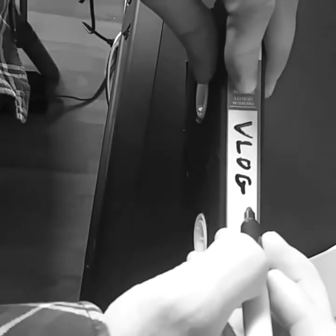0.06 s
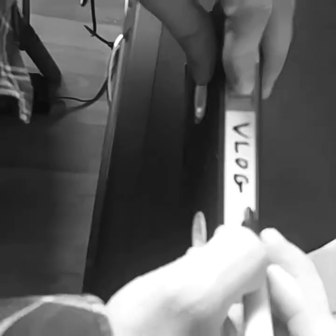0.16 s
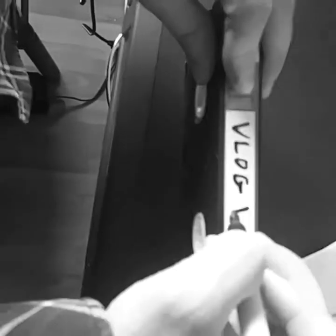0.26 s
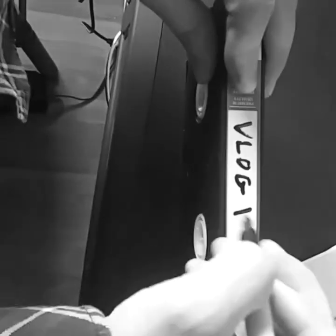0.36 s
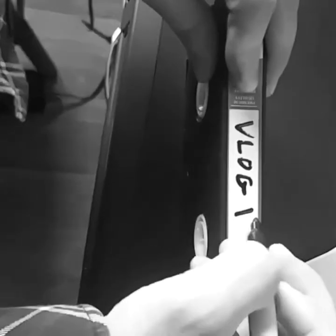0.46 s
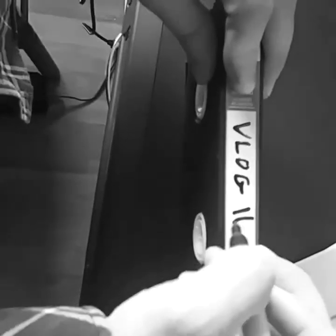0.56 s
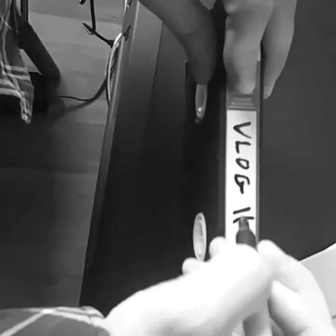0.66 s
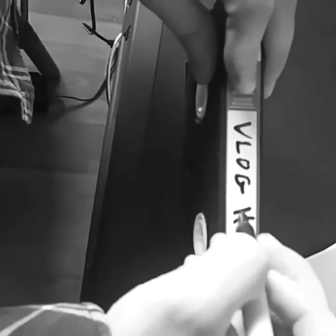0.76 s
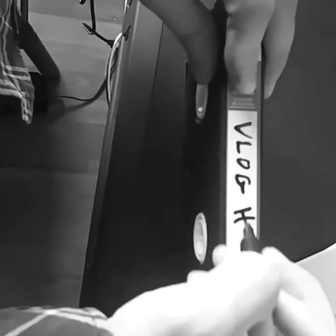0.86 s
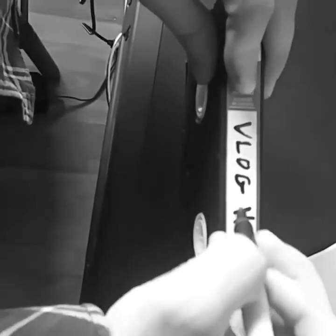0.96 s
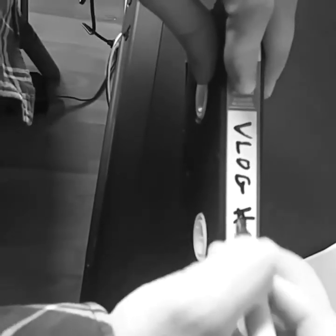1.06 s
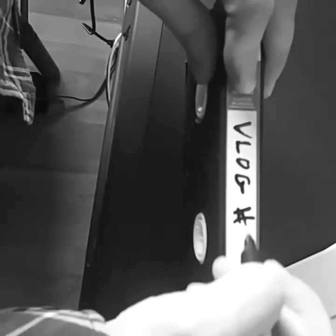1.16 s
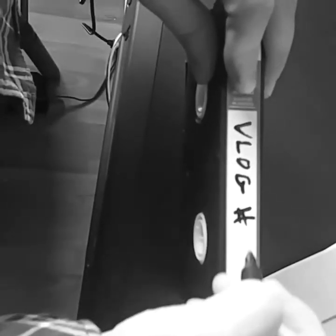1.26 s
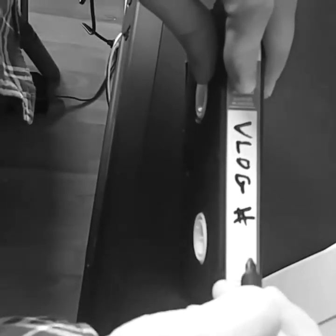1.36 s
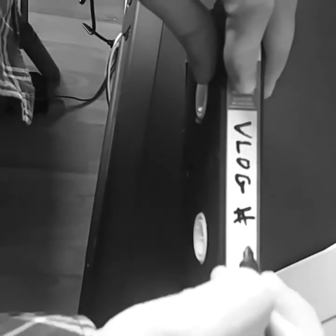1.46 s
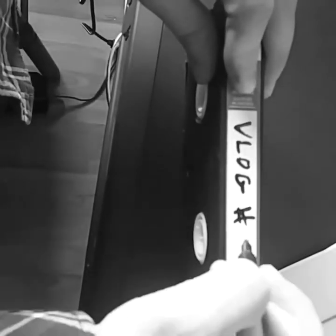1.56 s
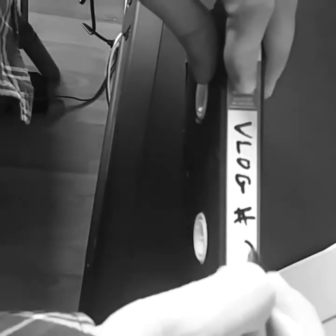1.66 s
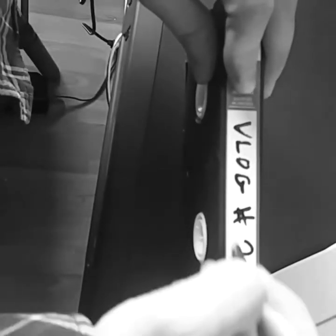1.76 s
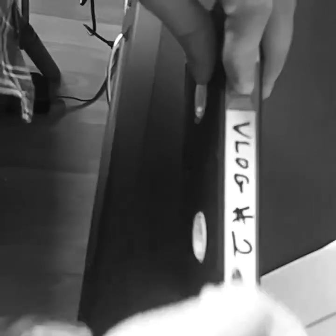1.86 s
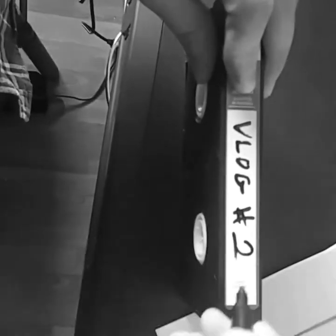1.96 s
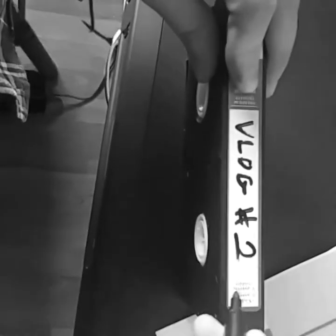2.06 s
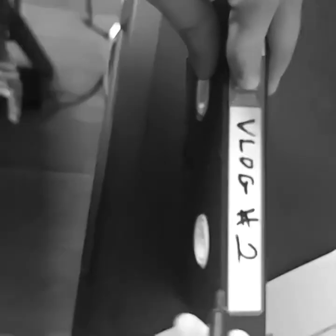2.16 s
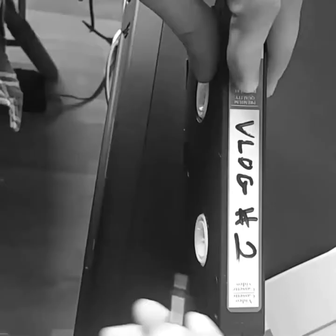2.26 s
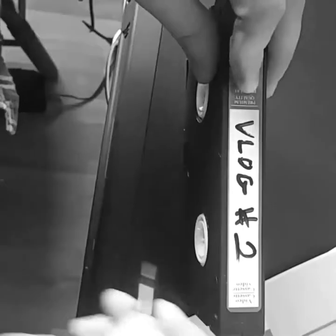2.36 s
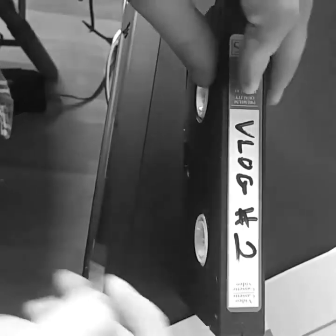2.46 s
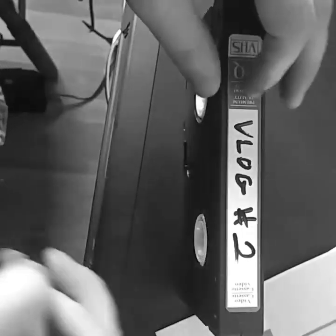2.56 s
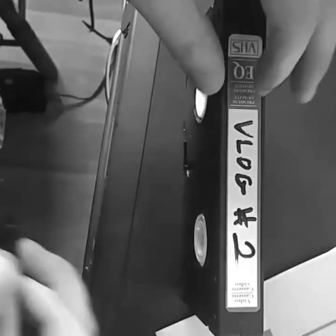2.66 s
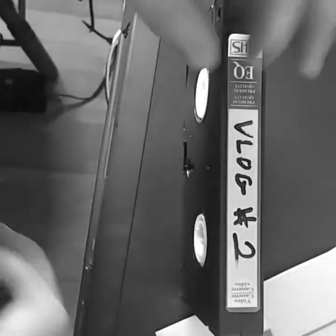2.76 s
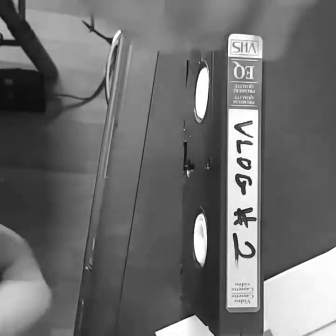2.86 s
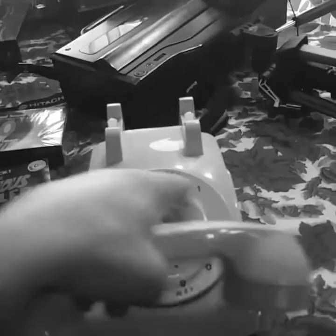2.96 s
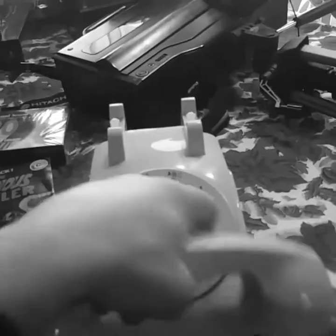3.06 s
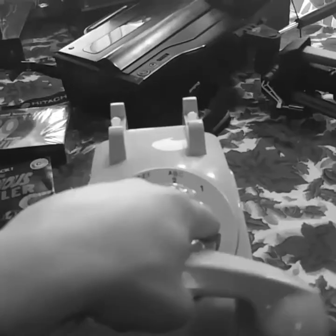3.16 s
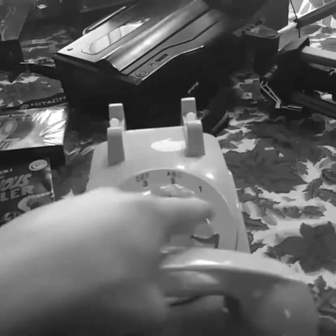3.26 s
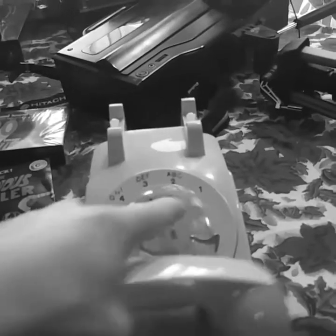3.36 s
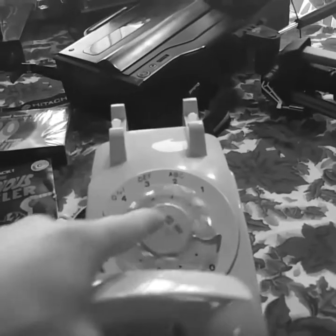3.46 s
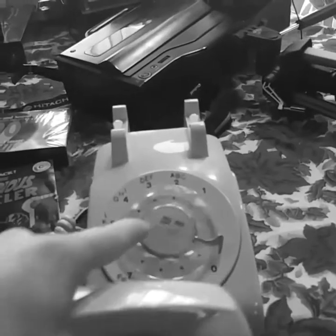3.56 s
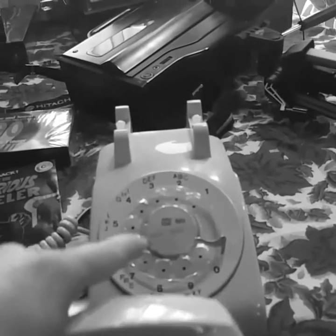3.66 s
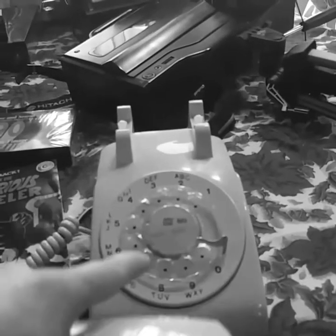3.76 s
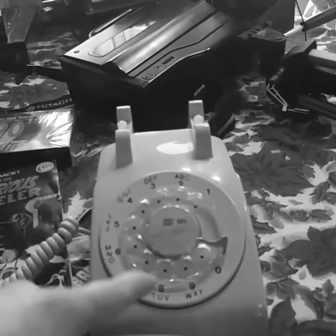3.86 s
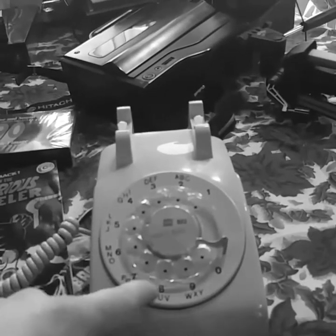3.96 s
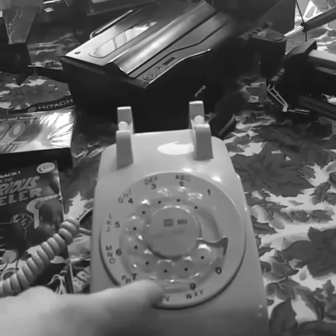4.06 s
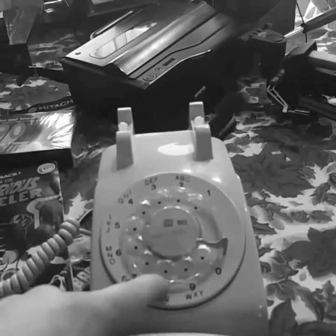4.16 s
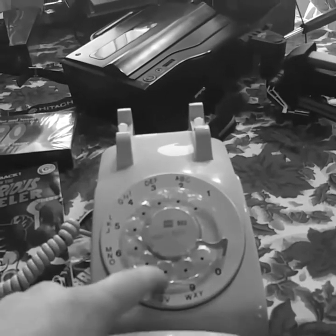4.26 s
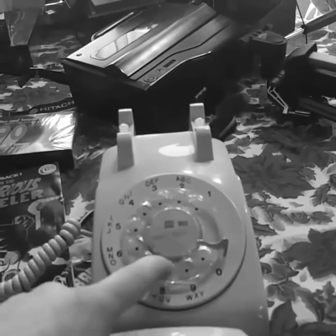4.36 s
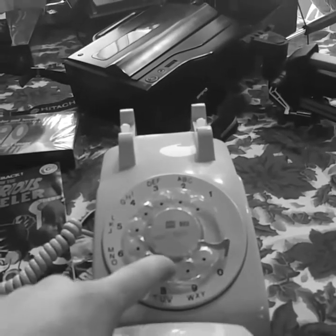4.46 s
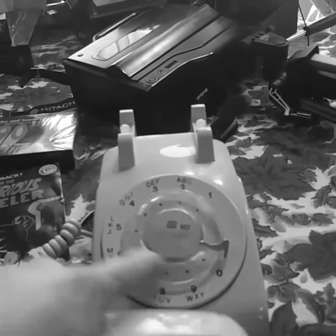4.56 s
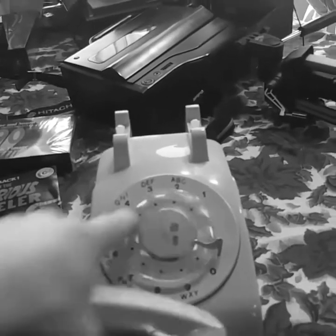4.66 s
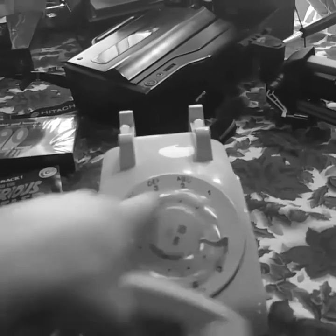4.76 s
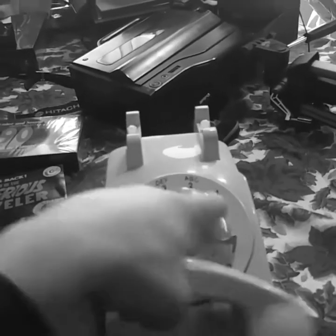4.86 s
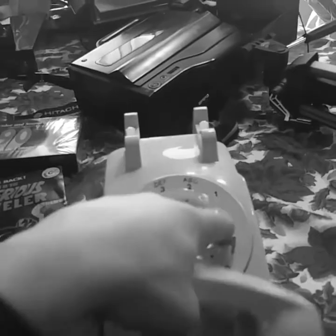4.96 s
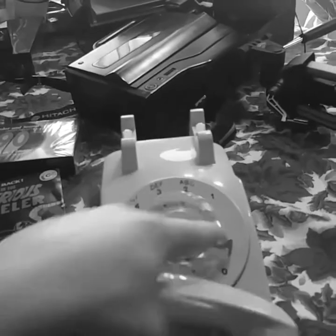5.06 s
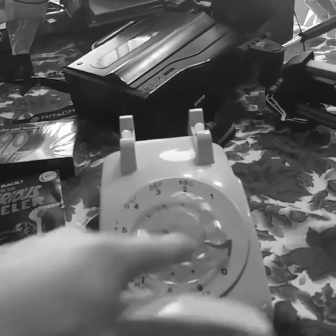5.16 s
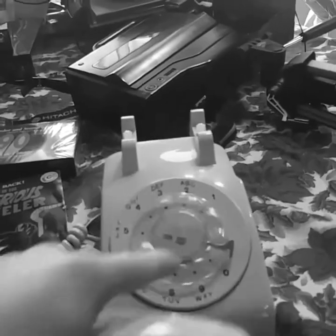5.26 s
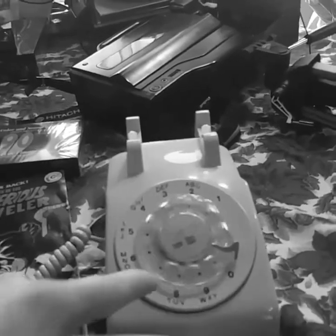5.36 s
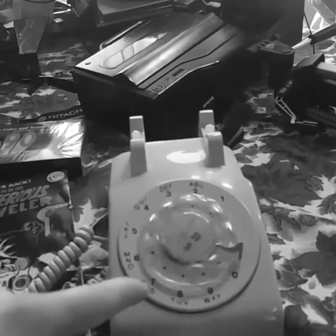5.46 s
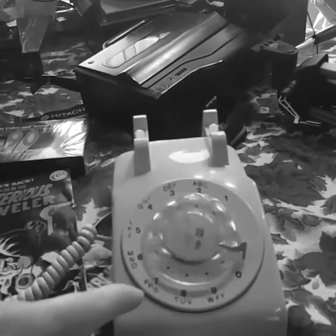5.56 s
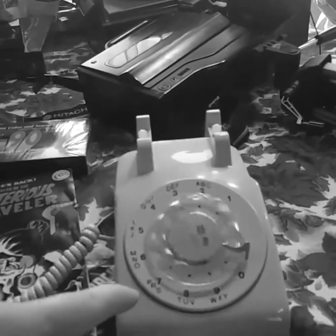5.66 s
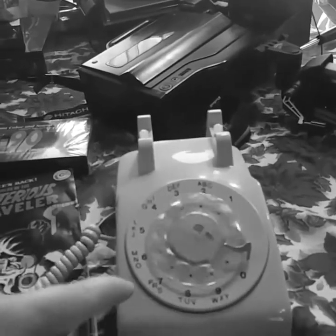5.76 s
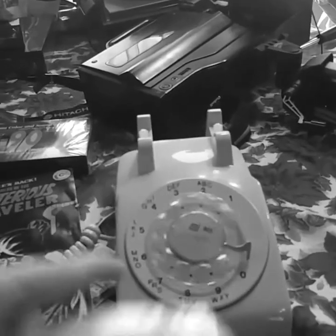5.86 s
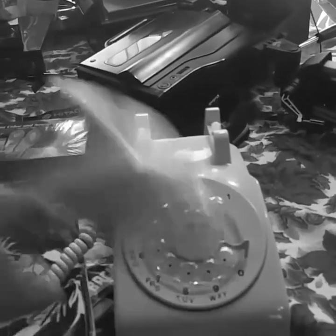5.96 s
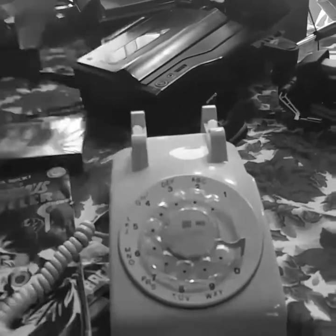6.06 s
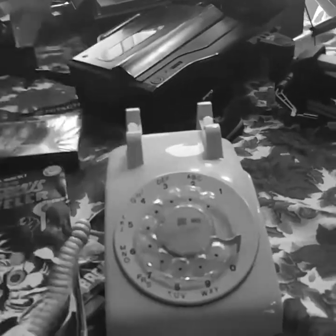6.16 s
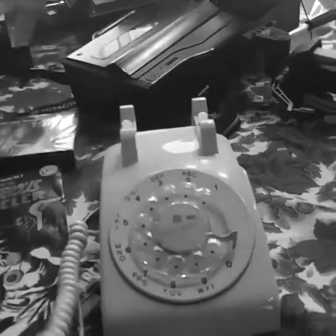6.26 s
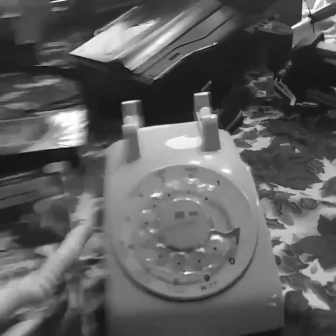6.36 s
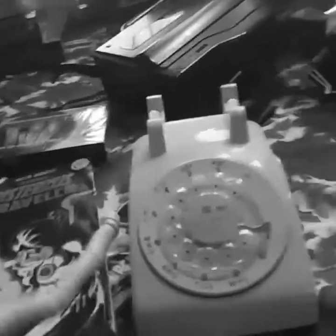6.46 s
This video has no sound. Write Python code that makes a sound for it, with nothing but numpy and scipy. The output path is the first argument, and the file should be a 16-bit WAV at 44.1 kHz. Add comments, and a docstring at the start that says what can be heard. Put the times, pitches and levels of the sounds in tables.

```python
"""A felt marker whispers on the label of a cassette box at a desk; then, at a table, a rotary telephone is dialled twice.
The finger winds the dial with a buzz of gear teeth; the spring runs it back with a whirr of gears and governor,
ending in a clack. The handset, held in the dialling hand, knocks on the table and on the plastic case.
Shaped noise makes the rubbing, tooth ticks the gears, short pushes and ringing modes the blows.
All is close: the direct sound outweighs the small furnished room, and a small microphone dulls the top."""
import sys
import numpy as np
from scipy import signal
from scipy.fft import rfft, irfft
from scipy.io import wavfile
from scipy.ndimage import uniform_filter1d

SR = 44100
rng = np.random.default_rng(int(sys.argv[2]) if len(sys.argv) > 2 else 0)


def bounce(signal):
    """Save signal as a 16-bit WAV file at the path given by the first command-line argument."""
    frames = np.transpose(np.atleast_2d(signal))
    limited = np.clip(frames, -1, 1)
    pcm = np.round(limited * 32767).astype(np.int16)
    wavfile.write(sys.argv[1], SR, pcm)


N = 287336
TIME = np.arange(N) / SR
TAIL = np.arange(SR // 2) / SR  # time axis of hits and room tail, s
HZ = np.fft.rfftfreq(8192, 1 / SR)  # frequency axis of all colours


def amp(db):
    """Decibels to gain."""
    return 10 ** (np.asarray(db) / 20)


def evened(x):
    """Scales to rms 1."""
    return x / np.sqrt(np.mean(x ** 2) + 1e-20)


def blow(x):
    """Scales a hit to the energy of 10 ms at rms 1."""
    return x / np.linalg.norm(x) * np.sqrt(SR / 100)


def read(points, hz=HZ):
    """Joins table rows on a log-frequency axis."""
    f, value = np.transpose(points)
    return np.interp(np.log(hz + 1), np.log(f + 1), value)


def add(mix, s, sound):
    """Mixes a sound in at time s."""
    part = mix[max(round(s * SR), 0):][:len(sound)]
    part += sound[:len(part)]


def gate(t, edge_s):
    """Fades in, holds, fades out."""
    return np.clip(np.minimum(t - t[0], t[-1] - t) / edge_s, 0, 1)


def colour(x, db):
    """Causal minimum-phase filter with the given gain at each of HZ."""
    log_gain = np.log(amp(np.maximum(db, db.max() - 90)))
    circle = np.concatenate([log_gain, log_gain[-2:0:-1]])
    spectrum = np.exp(np.conj(signal.hilbert(circle)))
    taps = np.fft.ifft(spectrum).real[:len(HZ)]
    return signal.oaconvolve(x, taps)[:len(x)]


def drift(n, per_s):
    """Smooth random wandering of rms 1."""
    width = max(int(SR / per_s), 1)
    smooth = uniform_filter1d(rng.standard_normal(n), width)
    return evened(uniform_filter1d(smooth, width))


def contact(hardness_hz):
    """A softer contact lasts longer and loses treble (dB)."""
    return -10 * np.log10(1 + (HZ / hardness_hz) ** 2)


def strike(db, chatter_t60, push):
    """One push and a dying chatter of loose parts and near echoes, through a body."""
    chatter = rng.standard_normal(len(TAIL)) * amp(-60 * TAIL / chatter_t60)
    chatter /= np.linalg.norm(chatter)
    chatter[0] += push
    return blow(colour(chatter, db))


def ringing(modes, reach_hz, rise_s):
    """A body's modes, each given a random starting phase; a slow push reaches only the low ones."""
    hz, db, t60 = np.transpose(modes)[:, :, None]
    level = db - 10 * np.log10(1 + (hz / reach_hz) ** 4)
    swing = np.sin(2 * np.pi * (hz * TAIL + rng.random(hz.shape)))
    sound = (amp(level - 60 * TAIL / t60) * swing).sum(0)
    return blow(sound * (1 - np.exp(-TAIL / rise_s)))


# plastic shell around the dial, relative levels: centre_hz, width_hz, level_db
HOUSING_RESONANCES = [(406, 430, -4.5), (923, 81, 1), (1176, 226, -2), (1916, 105, -3.5), (2294, 42, -14.5),
                      (3070, 190, -9.5), (3404, 150, -10), (3960, 670, -20), (5200, 280, -20.5)]


def housing(between_db=-27):
    """Resonances of the plastic shell around the dial (dB), over a floor between them."""
    power = amp(between_db) ** 2
    for hz, width, db in HOUSING_RESONANCES:
        power = power + amp(db) ** 2 / (1 + (2 * (HZ - hz) / width) ** 2)
    return 10 * np.log10(power)


# decay of the small furnished room: pitch_hz, t60_s
ROOM_DECAY = [(100, 0.47), (260, 0.65), (700, 0.21), (2000, 0.2), (6000, 0.24), (12000, 0.2)]


def room(x, wet_db, delay_s=0.0054):
    """Adds the tail of a small furnished room, each band dying at its own speed."""
    hz, t, z = signal.stft(rng.standard_normal(len(TAIL)), SR, nperseg=256)
    decay = amp(-60 * t / read(ROOM_DECAY, hz)[:, None])
    tail = signal.istft(z * decay, SR, nperseg=256)[1][:len(TAIL)]
    tail *= 1 - np.exp(-(TAIL / delay_s) ** 2)  # the reflections swell in after the direct sound
    return x + amp(wet_db) * signal.fftconvolve(x, tail / np.linalg.norm(tail))[:N]


# room rumble and hiss at the desk, ahead of the microphone's roll-off: pitch_hz, level_db per Hz
DESK_ROOM_TONE = [(25, -102), (50, -93.5), (75, -90), (120, -86), (165, -85.5), (230, -97.5), (300, -97.5),
                  (500, -111), (1500, -118), (4600, -120), (5450, -109), (6300, -118), (9000, -108),
                  (12500, -103)]
# the same at the telephone table: pitch_hz, level_db per Hz
TABLE_ROOM_TONE = [(25, -99), (80, -95.5), (170, -90), (300, -99), (500, -107), (1500, -116), (4600, -120),
                   (5450, -110), (6300, -118), (9000, -109), (12500, -107)]
TABLE_FROM_S = 3.09  # the place changes from desk to table


def air(spectrum):
    """Steady rumble of the room and hiss, as noise shaped in frequency."""
    gain = amp(read(spectrum, np.fft.rfftfreq(N, 1 / SR)))
    noise = irfft(rfft(rng.standard_normal(N)) * gain, N)
    return noise * np.sqrt(SR / 2)  # white noise of 0 dB per Hz before shaping


# marker strokes and sliding fingers: start_s, length_s, level_db
RUBS = [(0.418, 0.093, -70.5), (0.666, 0.09, -73.5), (0.94, 0.07, -71.5), (1.231, 0.069, -70.5),
        (1.365, 0.042, -70.5), (1.761, 0.15, -77.5), (1.909, .11, -69), (2.02, 0.052, -69),
        (2.917, 0.18, -74), (4.563, 0.086, -76), (5.248, 0.041, -53.5), (6.282, 0.12, -71)]
# colour of that rubbing: pitch_hz, level_db
FELT_COLOUR = [(100, -21), (300, -5.5), (800, 7), (1400, -4), (2000, 1.5), (3000, -1.5), (4500, 3.5),
               (6000, -2), (12000, -10)]
# light bumps of pen and hand: start_s, dull_db, dull_centre_hz, tick_db
LIGHT_BUMPS = [(.908, -85, 400, -69.5), (1.02, -61.5, 294, -83), (1.218, -54, 125, -66),
               (1.265, -54, 99, -73), (1.369, -64, 600, -79), (1.393, -58, 288, -76),
               (1.94, -67.5, 790, -81), (2.12, -74, 1160, -85), (2.578, -65.5, 820, -72),
               (6.464, -56.5, 327, -65)]


def handling(grain_db=3):
    """Felt tip and fingers stick and slip over card and plastic; pen and hand bump lightly."""
    out = np.zeros(N)
    for s, length, db in RUBS:
        n = int(length * SR)
        slips = rng.standard_normal(n) * amp(grain_db * drift(n, 900))
        rub = evened(colour(slips, read(FELT_COLOUR)))
        add(out, s, amp(db) * rub * signal.windows.tukey(n, .5))
    for s, dull_db, centre_hz, tick_db in LIGHT_BUMPS:
        off_centre = HZ / centre_hz - centre_hz / (HZ + 1)
        hollow_db = -20 * np.log10(1 + (1.52 * off_centre) ** 2)
        bump = strike(hollow_db, chatter_t60=.08, push=.3)
        tick = strike(housing(between_db=-20.5), chatter_t60=0.038, push=0.19)
        add(out, s, amp(dull_db) * bump)
        add(out, s, amp(tick_db) * tick)
    return room(out, wet_db=-6)


# every bounce comes sooner and is weaker than the one before
BOUNCE_RATIO, SHORTEST_BOUNCE_S = .58, .006
BOUNCE_THUD_DB, BOUNCE_BOOM_DB, BOUNCE_CRACK_DB = -8, -5, -4.5  # change at each bounce


def bounces(s, gap_s, count=5):
    """Times of a blow and of its ever quicker bounces."""
    gaps = gap_s * BOUNCE_RATIO ** np.arange(count)
    return s + np.cumsum([0, *gaps[gaps > SHORTEST_BOUNCE_S]])


# handset and finger stop (a first bounce of 0 means none):
# start_s, thud_db, table_boom_db, boom_reach_hz, plastic_crack_db, hardness_hz, first_bounce_after_s
HANDSET_KNOCKS = [(3.3424, -31.5, -32, 900, -34.5, 2840, 0), (4.1088, -30, -26, 564, -40.5, 1620, 0),
                  (4.5502, -34.5, -33, 520, -50.5, 1400, .027),
                  (4.7615, -36, -38.5, 500, -31, 12000, .0348), (4.86, -57, -38, 169, -69, 2000, 0),
                  (4.895, -50, -42.5, 298, -55.5, 4000, 0), (5.2036, -35, -32.5, 395, -55, 1201, .039),
                  (5.2625, -56, -34.5, 74.6, -48, 3500, 0)]
# modes of the table under the telephone, relative levels: pitch_hz, level_db, t60_s
TABLE_MODES = [(73, -5.5, .42), (110, -5.5, .38), (139, -8, .33), (173, 3, .32), (214, -5, .25),
               (258, -1, .27), (297, -1, .22), (325, -5, .2), (376, -4, .17), (405, -8, .2), (452, -7, .2),
               (540, -7, .15), (572, -4, .17), (690, -11, .24)]
# modes of the plastic telephone case, relative levels: pitch_hz, level_db, t60_s
CASE_MODES = [(856, -4, .2), (958, -3, .18), (1130, -4, .16), (1405, -4, .11), (1981, 0, .13),
              (2083, 2, .15), (2145, -1, .14), (2353, 1, .12), (2627, -4, .12), (2750, -2, .15),
              (3149, -2, .11), (3811, -5, .09), (4780, -1, .06), (5440, -1, .06)]
# colour of the thud through the base, also under the dial's clack: pitch_hz, level_db
THUD_COLOUR = [(40, -25), (90, -10.5), (200, 0), (330, 3.5), (570, -0.5), (680, -15.5), (1200, -18.5),
               (2500, -71.5), (8000, -94)]
# colour of the crack of plastic: pitch_hz, level_db
CRACK_COLOUR = [(150, -14), (600, -0.5), (950, 4.5), (1300, 2.5), (1750, -1.5), (2200, 4), (2650, -5.5),
                (3100, -0.5), (4200, -6), (4750, -1), (5600, -8.5), (12000, -7.5)]


def knocks(case_db=-12, base_hz=50):
    """Each knock cracks and rings on the plastic, thuds through the base and leaves the table booming."""
    low, high = np.zeros((2, N))
    for start, thud_db, boom_db, reach_hz, crack_db, hardness_hz, gap_s in HANDSET_KNOCKS:
        crack_colour = read(CRACK_COLOUR) + contact(hardness_hz)
        for k, s in enumerate(bounces(start, gap_s)):
            thud = strike(read(THUD_COLOUR), chatter_t60=0.14, push=1.1)
            boom = ringing(TABLE_MODES, reach_hz, rise_s=0.0056)
            crack = strike(crack_colour, chatter_t60=0.042, push=.25)
            case = amp(case_db) * ringing(CASE_MODES, hardness_hz, rise_s=0.00044)
            add(low, s, amp(thud_db + k * BOUNCE_THUD_DB) * thud)
            add(low, s, amp(boom_db + k * BOUNCE_BOOM_DB) * boom)
            add(high, s, amp(crack_db + k * BOUNCE_CRACK_DB) * (crack + case))
    low = signal.sosfilt(signal.butter(4, base_hz, "high", fs=SR, output="sos"), low)
    return low + room(high, wet_db=-7.0)  # only the crack and the case excite the room


# pawl of the dial clicking: start_s, level_db, hardness_hz
PAWL_CLICKS = [(4.289, -53.5, 2980), (4.486, -54, 4000), (4.746, -54.5, 2500), (4.984, -53, 5000),
               (5.148, -41.5, 8000)]
# tint of clicks and clack over the housing: pitch_hz, level_db
CLICK_COLOUR = [(120, -10), (350, -1.5), (1100, 1), (2000, -1.5), (3300, 3), (6000, 5.5), (12000, 8)]
REBOUND_S, REBOUND_DB = .005, -3  # each click strikes twice
REST_DB, REST_HARDNESS_HZ, REST_THUD_DB = -42.5, 4500, -54.5  # clack of the dial against its rest


def clicks():
    """Pawl and rest stop of the dial ring its housing, each with one quick rebound; the stop also jolts the base."""
    out = np.zeros(N)
    stops = [(rest, REST_DB, REST_HARDNESS_HZ) for _, rest, _ in DIAL_RETURNS]
    for s, db, hardness_hz in list(PAWL_CLICKS) + stops:
        body = housing() + read(CLICK_COLOUR) + contact(hardness_hz)
        for late_s, weaker_db in (0, 0), (REBOUND_S, REBOUND_DB):
            click = strike(body, chatter_t60=0.033, push=0.11)
            add(out, s + late_s, amp(db + weaker_db) * click)
    for s, _, _ in stops:
        jolt = strike(read(THUD_COLOUR), chatter_t60=0.24, push=0.6)
        add(out, s, amp(REST_THUD_DB) * jolt)
    return room(out, wet_db=-7.5)


# hub of the dial chafing when wound fast: start_s, length_s, level_db, from_hz, to_hz
HUB_CHAFES = [(3.224, 0.078, -55, 1237, 1315), (5.016, 0.0545, -42, 1062, 1320)]
CHAFE_EDGE_S, CHAFE_FADE_DB_PER_S = .008, -90


def chafing(waver=0.0655):
    """A rough, wavering squeak that rises as the spring tightens."""
    out = np.zeros(N)
    for s, length, db, from_hz, to_hz in HUB_CHAFES:
        t = np.arange(0, length, 1 / SR)
        pitch_hz = np.linspace(from_hz, to_hz, len(t)) * (1 + waver * drift(len(t), 300))
        cycles = np.cumsum(pitch_hz) / SR
        roughness = amp(2.9 * drift(len(t), 420))
        squeak = evened(np.sin(2 * np.pi * cycles) * roughness)
        level = amp(db + CHAFE_FADE_DB_PER_S * t) * gate(t, CHAFE_EDGE_S)
        add(out, s, level * squeak)
    return room(out, wet_db=-14)


def gears(teeth_per_s, uneven_db, rub, slop):
    """Uneven tooth-by-tooth ticks over the rubbing of the bearings."""
    n = len(teeth_per_s)
    teeth_passed = np.cumsum(teeth_per_s * (1 + slop * drift(n, 150))) / SR
    tick_gain = amp(uneven_db * np.clip(rng.standard_normal(n), -2, 2))
    ticks = np.diff(np.floor(teeth_passed), prepend=0) * tick_gain
    return evened(ticks) + rub * rng.standard_normal(n)


# mean speed of the dial under the finger, one curve for each wind: time_s, gear teeth per second
FINGER_WINDS = [
    [(3.11, 191), (3.14, 195), (3.16, 290), (3.283, 298), (3.305, 190), (3.345, 176)],
    [(4.728, 154), (4.76, 225), (4.87, 171), (4.94, 290), (5.055, 381), (5.09, 274), (5.15, 325),
     (5.18, 170)],
]
# tint of the winding buzz over the housing: pitch_hz, level_db
WIND_COLOUR = [(100, -6.5), (400, -3.5), (900, 1.5), (1250, 1.5), (2000, -1), (4000, -2.5), (6300, 2),
               (12000, -2)]
WIND_DB, WIND_TEETH_PER_S = -50, 301.4  # level at this speed
WIND_DB_PER_DOUBLING, WIND_EDGE_S = 13.5, 0.0065  # the faster, the louder


def winding():
    """The finger drags the gear train round against the spring; the buzz follows its speed in pitch and level."""
    out = np.zeros(N)
    for rows in FINGER_WINDS:
        s, teeth = np.transpose(rows)
        t = np.arange(s[0], s[-1], 1 / SR)
        speed = np.interp(t, s, teeth)
        level_db = WIND_DB + WIND_DB_PER_DOUBLING * np.log2(speed / WIND_TEETH_PER_S)
        drive = gears(speed, uneven_db=4.5, rub=1.0, slop=.08)
        buzz = evened(colour(drive, housing() + read(WIND_COLOUR)))
        add(out, s[0], amp(level_db) * gate(t, WIND_EDGE_S) * buzz)
    return room(out, wet_db=-6)


# dial running back, level before the fade: let_go_s, rest_s, level_db
DIAL_RETURNS = [(3.44, 3.8169, -56.5), (5.25, 6.133, -54.5)]
# tint of the whirr over the housing: pitch_hz, level_db
WHIRR_COLOUR = [(100, 4), (300, 0), (900, 1), (2000, 1), (3700, -3.5), (4600, -5.5), (12000, 1.5)]
FADE_IN_S, UNWIND_DB_PER_S = 0.041, -5.5  # softer as the spring slackens
COAST_S, COAST_DB_PER_S = .2, -130  # after the stop the whirr dies away with this extra slope


def running_back(teeth_per_s=410, governor_hz=39.6, throb=0.27):
    """The governor keeps the mean speed steady, its weights rubbing harder once in every turn."""
    out = np.zeros(N)
    for start, rest, db in DIAL_RETURNS:
        t = np.arange(0, rest - start + COAST_S, 1 / SR)
        coasting = np.maximum(t - (rest - start), 0)
        level_db = db + UNWIND_DB_PER_S * t + COAST_DB_PER_S * coasting
        level = np.minimum(t / FADE_IN_S, 1) * amp(level_db)
        drive = gears(np.full(len(t), teeth_per_s), uneven_db=2.5, rub=1.0, slop=.1)
        governor_turns = np.cumsum(governor_hz * (1 + 0.025 * drift(len(t), 8.9))) / SR
        drive *= 1 + throb * np.sin(2 * np.pi * governor_turns)
        whirr = evened(colour(drive, housing() + read(WHIRR_COLOUR)))
        add(out, start, level * whirr)
    return room(out, wet_db=-6.5)


def scene():
    """The desk first, then the telephone on its table."""
    floor = np.where(TIME < TABLE_FROM_S, air(DESK_ROOM_TONE), air(TABLE_ROOM_TONE))
    dial = clicks() + chafing() + winding() + running_back()
    return (floor + handling() + knocks() + dial)[None]


# response of the small microphone: pitch_hz, level_db
MICROPHONE_RESPONSE = [(6200, -1.5), (7000, -13), (8000, -20.5), (13300, -19.5), (14300, -35.5)]
BAND_EDGE_HZ = 15700


def record(dry):
    """A small microphone that falls away above 6 kHz; then the band limit."""
    heard = colour(dry[0], read(MICROPHONE_RESPONSE))
    band_limit = signal.firwin(511, BAND_EDGE_HZ, window=("kaiser", 9), fs=SR)
    return signal.oaconvolve(heard, band_limit, "same")[None]


dry = scene()
out = record(dry)
bounce(out)
```